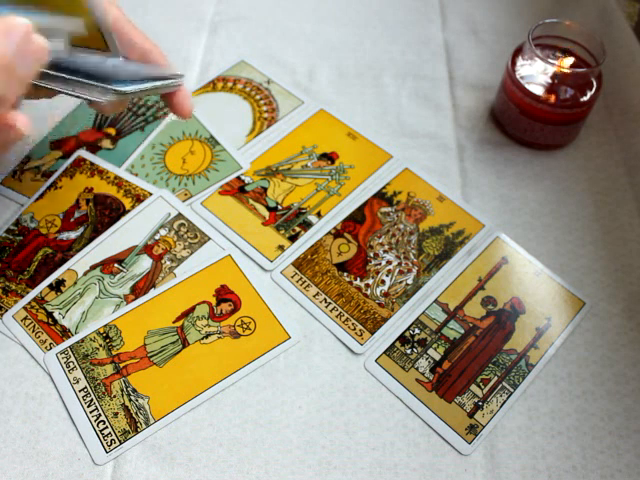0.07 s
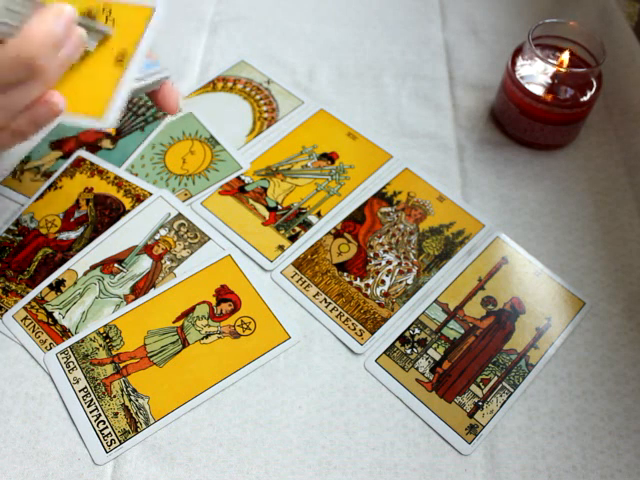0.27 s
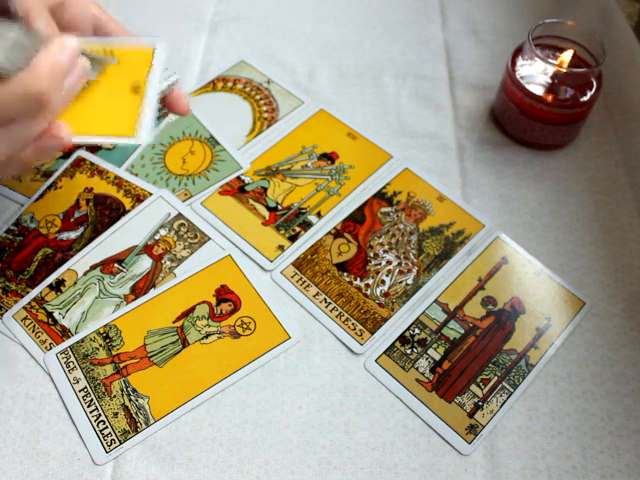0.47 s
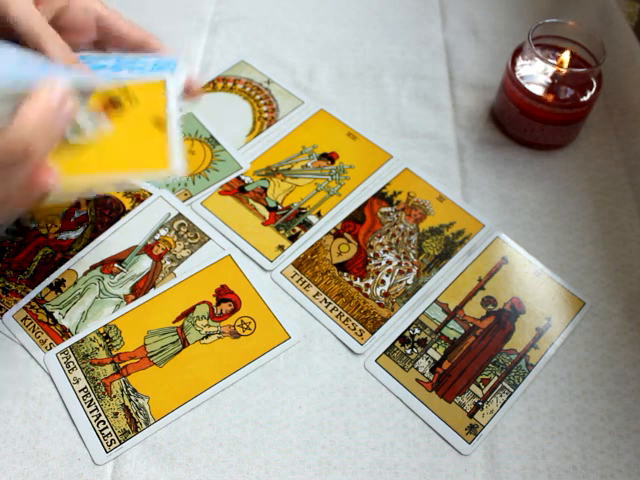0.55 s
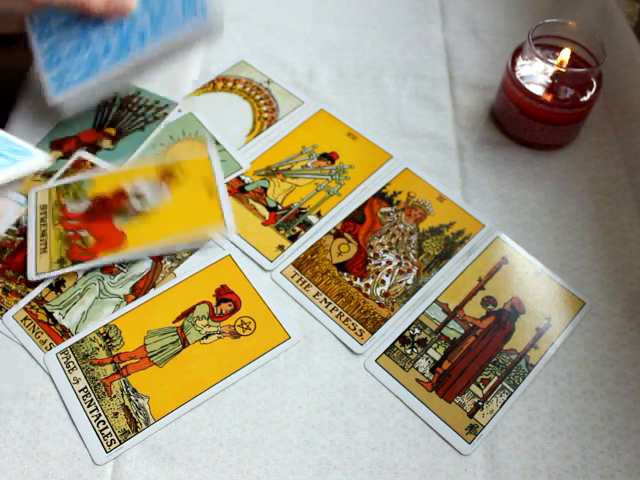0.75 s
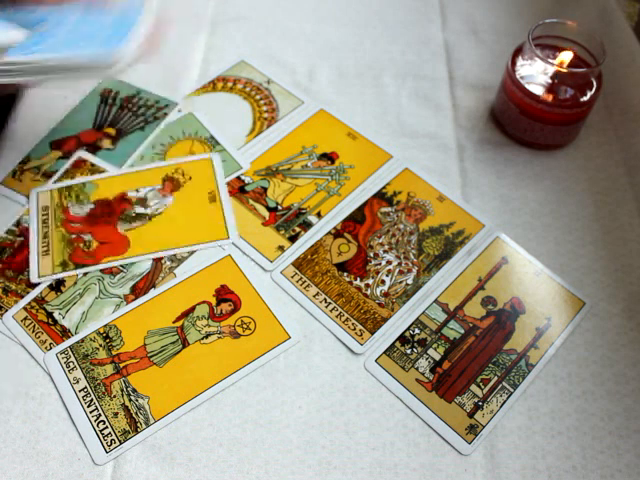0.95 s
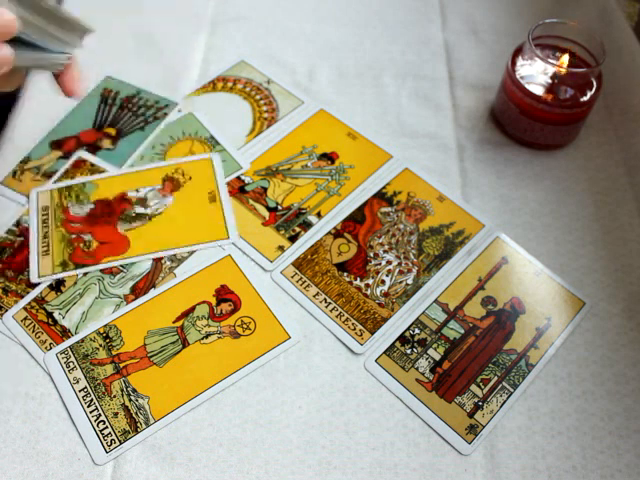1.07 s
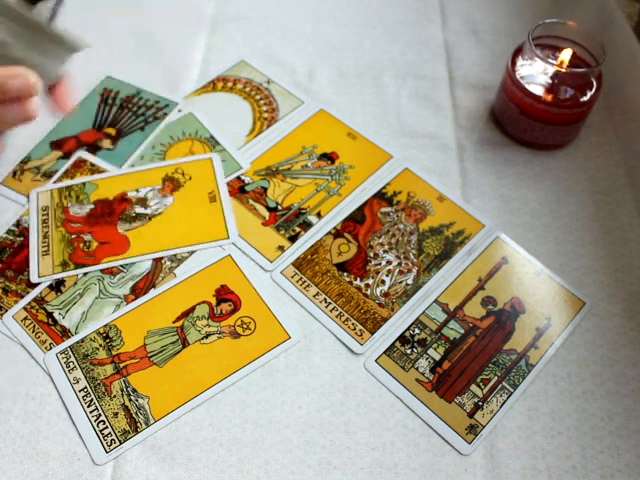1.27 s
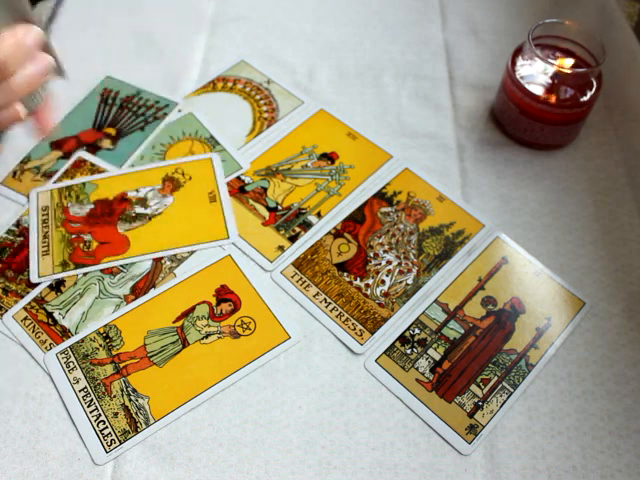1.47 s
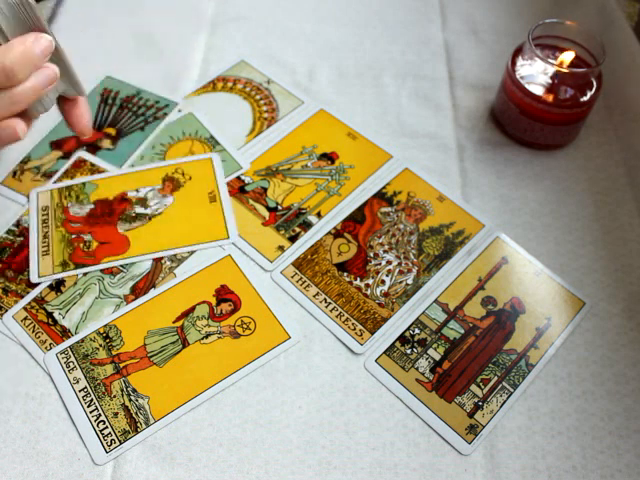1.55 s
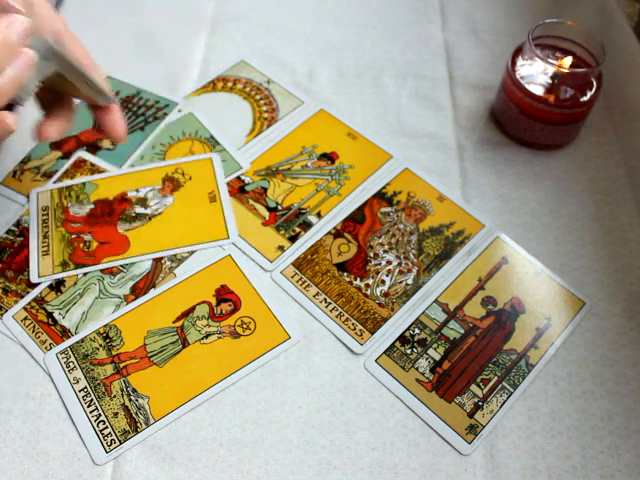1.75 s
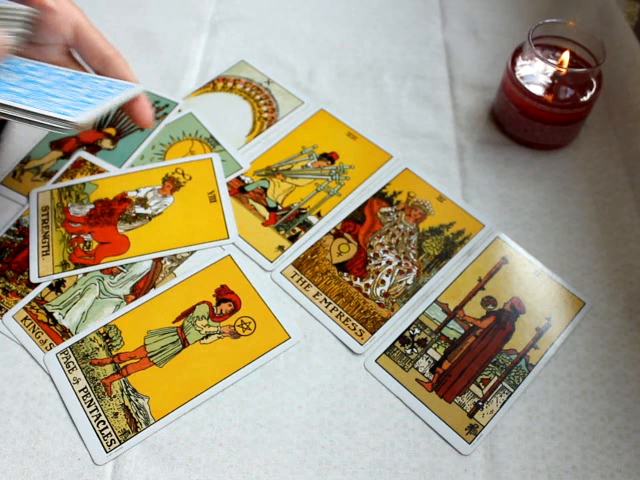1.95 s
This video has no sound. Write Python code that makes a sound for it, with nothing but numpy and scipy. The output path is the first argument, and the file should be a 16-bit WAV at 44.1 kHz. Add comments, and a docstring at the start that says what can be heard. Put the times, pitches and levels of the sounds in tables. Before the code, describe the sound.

A playing card is flicked and dealt, crisp clacks close up, faint rubs and steady hiss

```python
"""Stiff cards are handled close by, over a cloth-covered table in a small room, with a faint steady hiss.
First come soft rubs and ticks, then a card snaps out of the deck in a quick run of clacks.
The recorder's gain ducks under loud clacks, so the hiss sinks and slowly comes back.
The card is flicked over and lands in two more groups of clacks; faint slides and ticks follow.
Clacks are short tones and noise bursts; slides are streams of tiny clicks; room and table ring along."""
import sys
import numpy as np
from scipy import signal
from scipy.fft import rfft, irfft, next_fast_len
from scipy.io import wavfile
from scipy.ndimage import uniform_filter1d

SR = 44100
rng = np.random.default_rng(int(sys.argv[2]) if len(sys.argv) > 2 else 0)


def digitize_waveform(pressure):
    """Quantize a signal to 16-bit integers and store it at the path in sys.argv[1].

    Rows of a 2-D input are taken as channels; values are limited to [-1, 1].
    """
    field = np.atleast_2d(pressure).T
    bounded = np.clip(field, -1, 1)
    quanta = np.round(bounded * 32767).astype(np.int16)
    wavfile.write(sys.argv[1], SR, quanta)


N = 85995
T = np.arange(N) / SR

OVERTONE_RATIO, OVERTONE_DB = 1.467, -7   # second bending mode of a card; it dies sooner by the same ratio
CRACK_T60_S, THUD_T60_S = 0.008, 0.022   # time to lose 60 dB, before colouring
EDGE_SHARE = 0.58   # amplitude share of a burst's first instant, before colouring
THUD_HZ = 520   # pitch at which the thud has the colour in its table
HARD_KNEE_DB, CLACK_PEAKS_DB = -17, -3.5   # strikes with a crack above the knee get the narrow peaks

# Card edges strike: (time [s], ring level [dB], ring pitch [Hz], ring t60 [s],
# crack level [dB], crack tilt [dB per octave], thud level [dB], thud pitch [Hz])
STRIKES = [ (0.1884, -44, 2460, .008, -34.5, -6, -48, 383),
           (0.1921, -37, 1870, 0.0041, -32, -4.5, -44, 390), (0.2145, -37, 1980, 0.027, -33, -8, -44, 400),
           (0.2324, -22, 1430, 0.0088, -20.5, -1, -25.5, 338),
           (0.2357, -16, 756, 0.0083, -29, -16, -24.5, 457),
           (0.2365, -13.5, 1720, 0.037, -10.5, 2, -18, 663),
           (0.2444, -8, 2550, 0.0032, -2, -0.5, -28.5, 600), (0.2485, -13, 1680, 0.016, -23, -6, -23, 604),
           (0.2509, -12, 1460, 0.012, -14, -1, -19, 647), (0.2533, -12, 1830, 0.011, -11, -2.5, -33, 650),
           (0.2566, -8, 1940, 0.0076, -6.5, -1, -19, 684), (0.258, -10, 1330, 0.011, -18, -8, -38, 608),
           (0.26, -5, 1460, 0.015, -23, 7, -41, 600), (0.2607, -4, 1770, 0.012, -6, -1.5, -26, 600),
           (0.2745, -34.5, 2245, 0.0081, -21, -4.5, -31, 650),
           (0.31, -12.5, 1640, 0.003, -24, 0.5, -56, 600), (0.4338, -20.5, 3170, 0.0023, -31, -3, -56, 517),
           (0.5290, -61, 3200, .007, -41, 1, -76, 520), (0.5867, -41, 943, 0.041, -37.5, -.5, -58, 510),
           (0.6064, -45.5, 995, 0.028, -45, 3, -55, 520), (0.6560, -41, 1220, 0.045, -49, 7, -74, 520),
           (0.6918, -15, 2750, 0.01, -16.5, -0.9, -32.5, 550),
           (0.6970, -15.5, 1039, 0.043, -24, 2.5, -36.5, 350),
           (0.7003, -19.5, 3080, .012, -29.5, -4.5, -40.5, 337),
           (0.7055, -29, 2450, 0.0072, -32, -6, -35.5, 336),
           (0.7372, -26.5, 2800, 0.0053, -29.5, 0, -49, 405),
           (0.7887, -26, 4450, 0.0043, -24.5, 3, -40.5, 650),
           (0.7899, -27.5, 3150, 0.011, -42, 10, -63, 643),
           (0.8233, -25.5, 2380, 0.013, -22.5, 3, -47, 300),
           (1.0712, -48, 5060, 0.0044, -30.5, 6, -45.5, 334), (1.086, -32, 2050, 0.027, -49, 1, -50, 333),
           (1.0891, -29, 3580, .008, -28.5, -3, -42, 383), (1.1063, -21, 2330, .009, -23, -2, -38.5, 358),
           (1.1097, -20, 3540, 0.0065, -22.5, 2, -44, 358), (1.1125, -32, 992, 0.023, -35, -4.5, -50, 370),
           (1.1475, -37, 2100, 0.0088, -39.5, 1, -46, 220),
           (1.3117, -48.5, 1110, 0.033, -37.5, 3.5, -58, 520),
           (1.7896, -43.5, 840, 0.02, -38, 1.5, -61, 523), (1.829, -32.5, 2980, 0.014, -43, 2, -73, 520),
           (1.8391, -36.5, 3230, 0.0098, -42, -2.5, -61, 510),
           (1.8913, -53, 2630, .006, -42.5, 2, -73, 520)]
# Colour of the crack, before its tilt: (frequency [Hz], relative level [dB])
CRACK_COLOUR = [(150, -34.5), (500, -9), (1200, -4), (2500, 1), (4500, -2.5), (7500, -6.5), (9200, -12),
                (11000, -12.5), (15500, -21)]
# Colour of the thud, shifted to the pitch of each strike: (frequency [Hz], relative level [dB])
THUD_COLOUR = [(30, -49), (90, -35), (170, -16), (290, -7), (400, -3), (520, 3), (750, 0), (1200, -7.5),
               (3000, -49)]


def contacts():
    """Each strike is a crack of the edge, a short ring of the free part of the card and a thud of pushed air."""
    light, hard = np.zeros(N), np.zeros(N)
    t = T[:SR // 10]
    for start, ring_db, ring_hz, ring_t60, crack_db, tilt_db, thud_db, thud_hz in STRIKES:
        ring = np.zeros(len(t))
        for ratio, mode_db in ((1, 0), (OVERTONE_RATIO, OVERTONE_DB)):
            mode = np.sin(2 * np.pi * ring_hz * ratio * t) * dying(t, ring_t60 / ratio)
            ring -= from_db(ring_db + mode_db) * mode
        # Keep the rumble of the abrupt start out of the ring
        high_pass = signal.butter(2, ring_hz / 2, "high", fs=SR, output="sos")
        ring = signal.sosfilt(high_pass, ring)

        crack = from_db(crack_db) * burst(t, CRACK_T60_S, CRACK_COLOUR, EDGE_SHARE, tilt_db)
        shifted_colour = np.array(THUD_COLOUR) * [thud_hz / THUD_HZ, 1]
        thud = from_db(thud_db) * burst(t, THUD_T60_S, shifted_colour, EDGE_SHARE)
        add(hard if crack_db > HARD_KNEE_DB else light, start, ring + crack + thud)
    return light + hard + from_db(CLACK_PEAKS_DB) * clack_colour(hard)


def burst(t, t60, spectrum, edge, tilt_db=0):
    """A sharp edge followed by a dying scatter of tiny contacts."""
    envelope = dying(t, t60)
    scatter = unit_energy(envelope * rng.standard_normal(len(t)))
    x = scatter * np.sqrt(1 - min(edge ** 2, 1))
    x[0] -= edge
    x = coloured(evened(x, 700), spectrum, tilt_db)
    return unit_energy(x) * np.sqrt(np.sum(envelope ** 2))


PEAK_WIDTH_HZ = 48   # width of each peak
# Narrow peaks in the hard clacks, before their overall level: (frequency [Hz], gain [dB])
CLACK_PEAKS = [(500, -4), (657, -1.5), (720, 0.5), (1045, 7), (1355, 5), (1467, 4), (1666, 0), (1755, -6),
               (1928, -2), (2298, 13), (2473, 0), (2766, -6), (3207, 1)]


def clack_colour(x):
    """Narrow peaks that colour the hard clacks, as closely spaced strikes and table reflections do."""
    out = np.zeros(N)
    r = np.exp(-np.pi * PEAK_WIDTH_HZ / SR)   # how much of the filter's output survives one sample
    for hz, gain_db in CLACK_PEAKS:
        feed = [(1 - r * r) / 2, 0, (r * r - 1) / 2]
        feedback = [1, -2 * r * np.cos(2 * np.pi * hz / SR), r * r]
        out += from_db(gain_db) * signal.lfilter(feed, feedback, x + 1e-18)
    return out


GRAINS_PER_S, GRAIN_SPREAD_DB = 6500, 2   # average rate; average random boost of a grain
RUB_ATTACK_S, RUB_RELEASE_S = 0.00085, 0.0043   # time constants
# Cards rub over cards: (start [s], length [s], level at the middle [dB],
# swell from start to end [dB], tilt [dB per octave])
STROKES = [ (0.000, 0.05, -58.5, -14, -5.5), (0.050, 0.04, -49.5, -2, -5.5), (0.077, 0.027, -48.5, 2, -4.5),
           (0.093, 0.0069, -42, -3, -3.1), (0.235, .028, -25.5, 8, -6), (0.45, 0.1, -54, -7.5, -7),
           (0.588, 0.074, -58, 12.5, -7.5), (1.048, 0.027, -57, -4, -3), (1.07, 0.024, -35.5, 10, 2.5),
           (1.084, 0.017, -28, -0.5, -0.1), (1.11, .011, -34, 0, -3.5), (1.280, .030, -56.5, 4, -1.5),
           (1.310, 0.011, -48, -2, -2.5), (1.326, 0.11, -61.5, -10, -0.5), (1.422, 0.031, -55.5, -2, -.5),
           (1.559, .050, -64, -9, -1.5), (1.787, 0.024, -47.5, -7, -2), (1.806, 0.019, -39.5, 3.5, 1.4),
           (1.83, 0.014, -44, -5, -1.5)]
# Colour of the rubbing, before its tilt: (frequency [Hz], relative level [dB])
RUB_COLOUR = [(80, -40), (250, -28), (600, -16.5), (1300, -6.5), (2100, 0.5), (3600, 0.5), (5200, 0),
              (6700, -2), (9000, -5), (12500, -8), (15500, -7)]


def slides():
    """Card faces catch and slip in a dense stream of tiny grains; each stroke swells or fades, then stops."""
    out = np.zeros(N)
    t = T[:SR // 5]
    for start, length, middle_db, swell_db, tilt_db in STROKES:
        sizes = from_db(GRAIN_SPREAD_DB * rng.exponential(1, len(t)))
        sizes = sizes * rng.choice([-1, 1], len(t))
        happens = rng.random(len(t)) < GRAINS_PER_S / SR
        grains = coloured(sizes * happens, RUB_COLOUR, tilt_db)

        attack = 1 - np.exp(-t / RUB_ATTACK_S)
        release = np.exp(-np.maximum(t - length, 0) / RUB_RELEASE_S)
        level_db = middle_db + swell_db * (np.minimum(t / length, 1) - 0.5)
        add(out, start, grains / grains.std() * attack * release * from_db(level_db))
    return out


TABLE_HZ, TABLE_T60_S, TABLE_DB = 340.4, 0.38, -2.5


def table(x):
    """The cards make the table top hum briefly at one low resonance."""
    t = T[:SR // 2]
    envelope = dying(t, TABLE_T60_S)
    hum = 2 * np.cos(2 * np.pi * TABLE_HZ * t) * envelope / envelope.sum()
    return from_db(TABLE_DB) * signal.fftconvolve(x, hum)[:N]


EARLY_DB, EARLY_T60_S = -6.5, 0.087   # scatter from hands and table
ROOM_DELAY_S, ROOM_BUILD_S = 0.002894, 0.0032   # wait before the tail; time constant of its growth
ROOM_EVEN_HZ = 45
# Echo tail of the room: (band centre [Hz], t60 [s], level before the band filter [dB])
ROOM_BANDS = [(180, 0.77, -27), (380, 0.18, -5.5), (830, 0.26, -13), (1760, 0.26, -13.5),
              (4060, 0.21, -9.5), (9500, 0.12, -14.5)]


def room(x):
    """The direct sound, early scatter off hands and table, then a diffuse tail that dies soonest in the treble."""
    t = T[:SR // 2]
    scatter = rng.standard_normal(len(t)) * dying(t, EARLY_T60_S) * (t > ROOM_DELAY_S / 2)
    response = from_db(EARLY_DB) * unit_energy(scatter)
    build = 1 - np.exp(-np.maximum(t - ROOM_DELAY_S, 0) / ROOM_BUILD_S)
    for hz, t60, level_db in ROOM_BANDS:
        band = signal.butter(2, [hz / 1.5, hz * 1.5], "band", fs=SR, output="sos")
        tail = evened(rng.standard_normal(len(t)) * build * dying(t, t60), ROOM_EVEN_HZ)
        response += from_db(level_db) * signal.sosfilt(band, unit_energy(tail))
    response[0] += 1   # the direct sound
    return signal.fftconvolve(x, evened(response, ROOM_EVEN_HZ))[:N]


HISS_DB = -56   # before the gain ducks
# Colour of the hiss: (frequency [Hz], relative level [dB])
HISS_COLOUR = [(20, 15), (35, 5.5), (55, -2), (110, -2), (210, 4.5), (400, 2.5), (900, 5.5), (2200, 3),
               (5000, 0), (10000, -4), (15500, -4)]


def hiss():
    """Steady random noise, filtered to its colour."""
    return from_db(HISS_DB) * coloured(rng.standard_normal(N), HISS_COLOUR)


def from_db(db):
    """Turn decibels into an amplitude factor."""
    return 10 ** (np.asarray(db) / 20)


def dying(t, t60):
    """Envelope that loses 60 dB in t60 seconds."""
    return np.exp(-np.log(1000) * t / max(t60, 1e-4))


def unit_energy(x):
    """Scale to a sum of squares of one."""
    return x / np.sqrt(np.sum(x ** 2) + 1e-20)


def add(out, start, x):
    """Mix x in at the given start in seconds."""
    i = max(int(start * SR), 0)
    out[i:i + len(x)] += x[:max(N - i, 0)]


def coloured(x, spectrum, tilt_db=0):
    """Filter of unit power gain that follows a spectrum, tilted per octave around 1000 Hz."""
    size = next_fast_len(len(x) // 2 + 2048) * 2
    octave = np.log2(np.maximum(np.arange(size // 2 + 1) * SR / size, 10))
    hz, db = np.transpose(spectrum)
    # The tilt stops one octave below 1000 Hz
    tilt = tilt_db * np.maximum(octave - np.log2(1000), -1)
    gain = from_db(np.interp(octave, np.log2(hz), db) + tilt)
    return causal(x, gain / np.sqrt(np.mean(gain ** 2)))


def evened(x, width_hz):
    """Level out chance humps and hollows of the spectrum that are wider than width_hz."""
    power = np.abs(rfft(x, 2 * len(x))) ** 2
    power = uniform_filter1d(power, int(width_hz * 2 * len(x) / SR))
    return causal(x, np.sqrt(power.mean() / (power + 1e-12)))


def causal(x, gain):
    """Minimum-phase filter with the given gain per frequency bin: it acts as early as it can."""
    cepstrum = irfft(np.log(gain))
    size = len(cepstrum)
    # Fold the backward half onto the forward half
    cepstrum[1:size // 2] *= 2
    cepstrum[size // 2 + 1:] = 0
    return irfft(rfft(x, size) * np.exp(rfft(cepstrum)))[:len(x)]


def scene():
    """Cards, the table, their room and a steady hiss."""
    cards = contacts() + slides()
    return (room(cards) + table(cards) + hiss())[None]


DUCK_ABOVE_DB, DUCK_SHARE = -19, 0.64   # share of the excess level that is taken away
RECOVER_DB_PER_S = 22
CUTOFF_HZ = 15780


def record(dry):
    """Gain control ducks under loud sounds and recovers slowly; peaks are rounded, the top is cut."""
    size = SR // 50   # averaging window of 20 ms
    window = np.ones(size) / size
    power = signal.fftconvolve(dry[0] ** 2, window)[:N]
    level_db = 10 * np.log10(np.maximum(power, 1e-12))
    over_db = DUCK_SHARE * np.maximum(level_db - DUCK_ABOVE_DB, 0)

    # Hold the deepest duck so far, while it recovers at a steady rate
    recovered_db = RECOVER_DB_PER_S * T
    duck_db = np.maximum.accumulate(over_db + recovered_db) - recovered_db
    duck_db = signal.fftconvolve(duck_db, window)[:N]

    rounded = 1.3 * np.tanh(dry * from_db(-duck_db) / 1.3)
    low_pass = signal.firwin(401, CUTOFF_HZ, fs=SR)[None]
    return signal.fftconvolve(rounded, low_pass, "same")


dry = scene()
out = record(dry)
digitize_waveform(out)
```